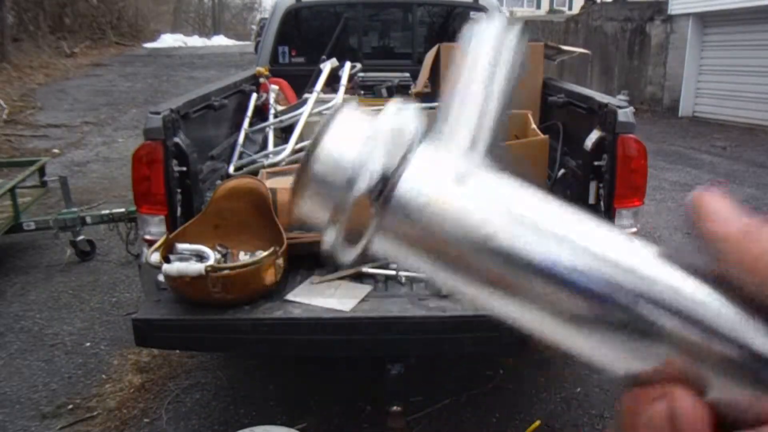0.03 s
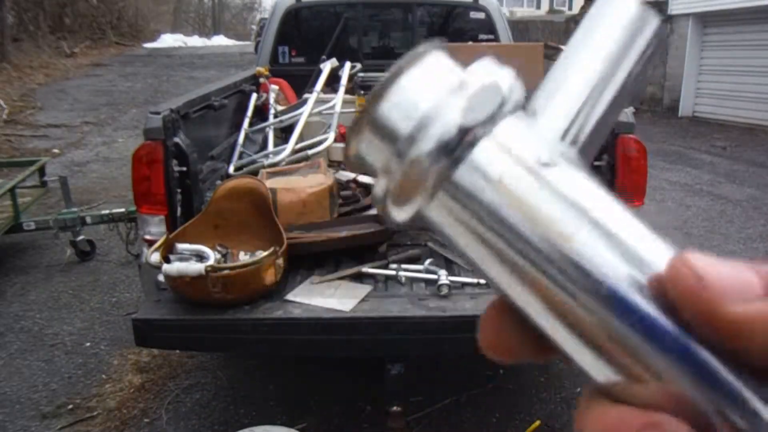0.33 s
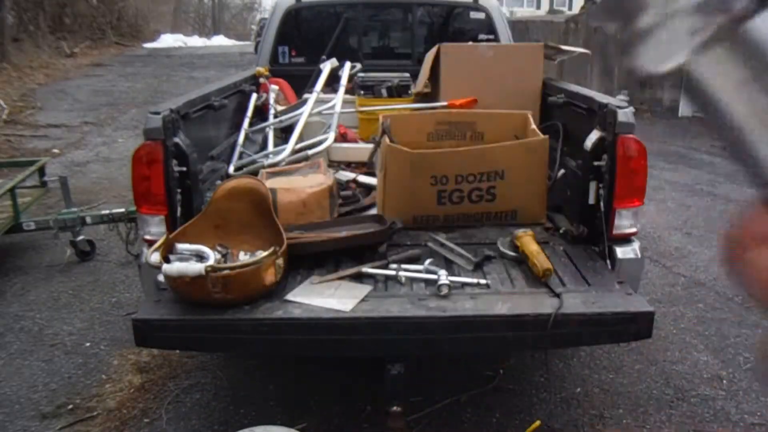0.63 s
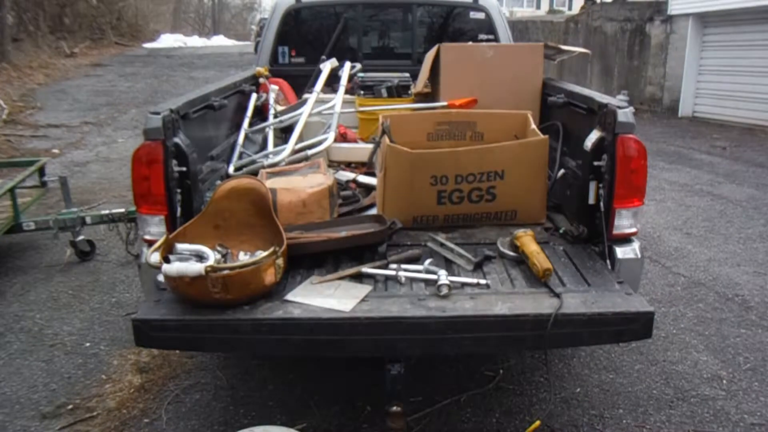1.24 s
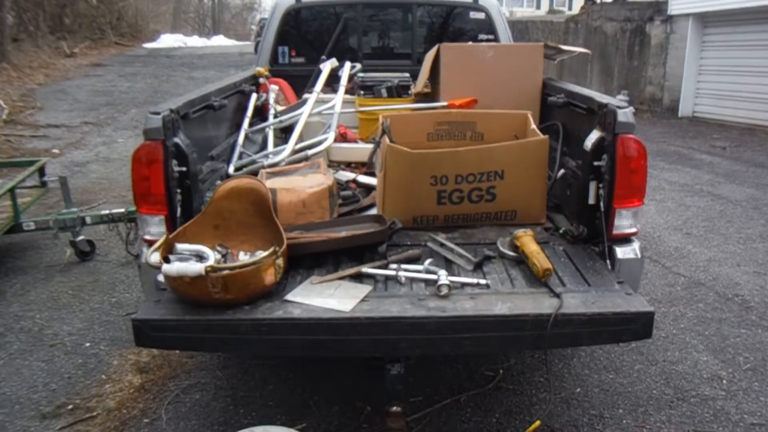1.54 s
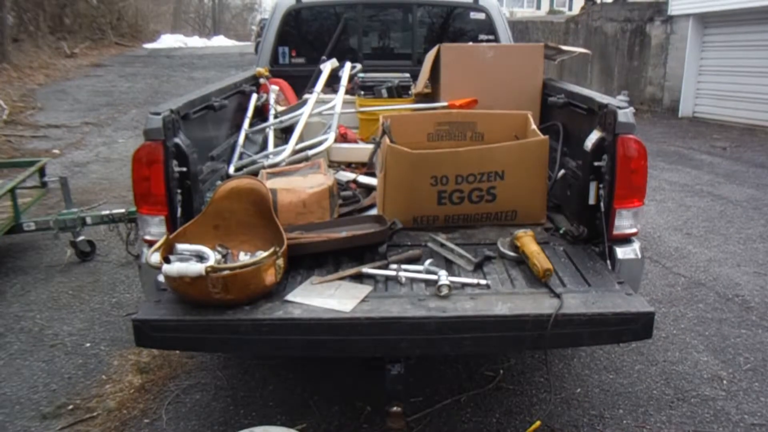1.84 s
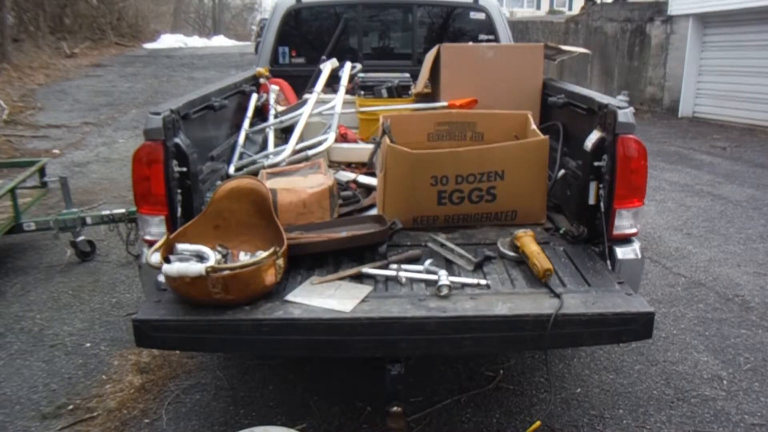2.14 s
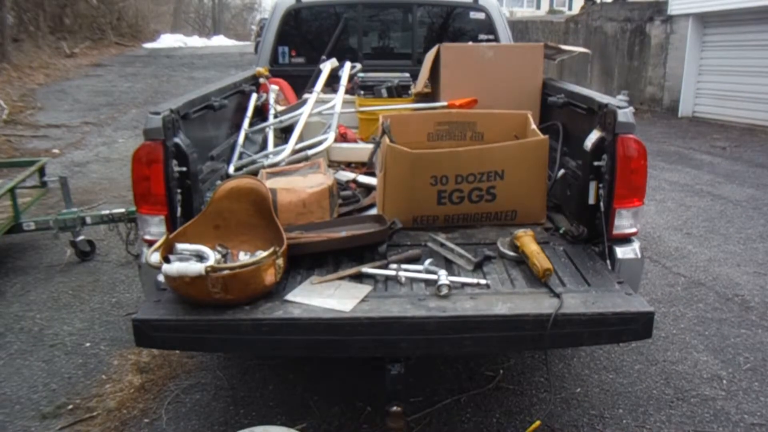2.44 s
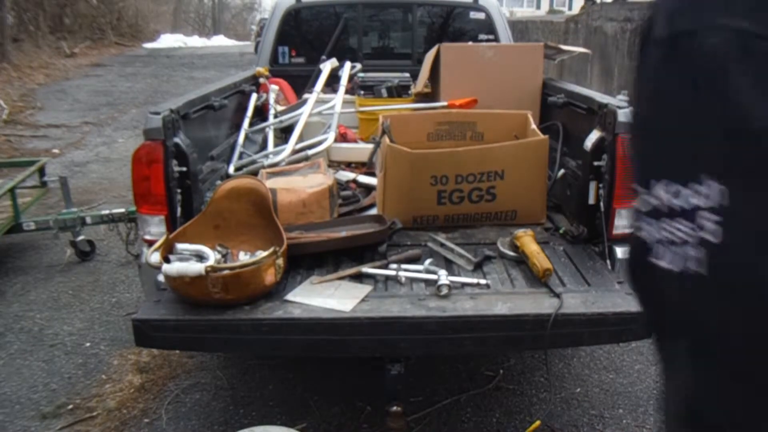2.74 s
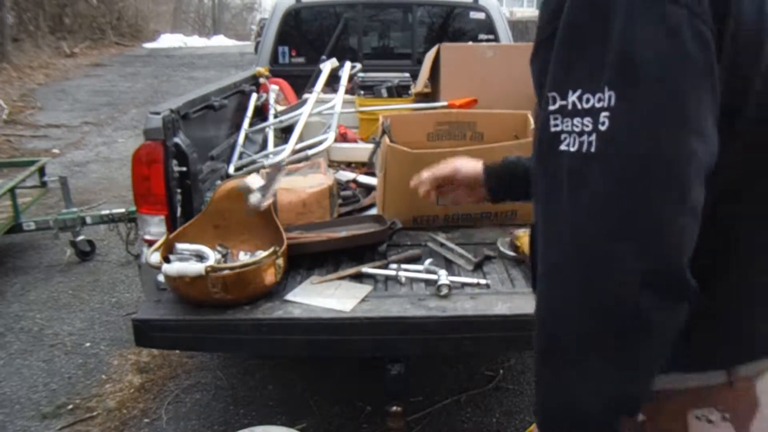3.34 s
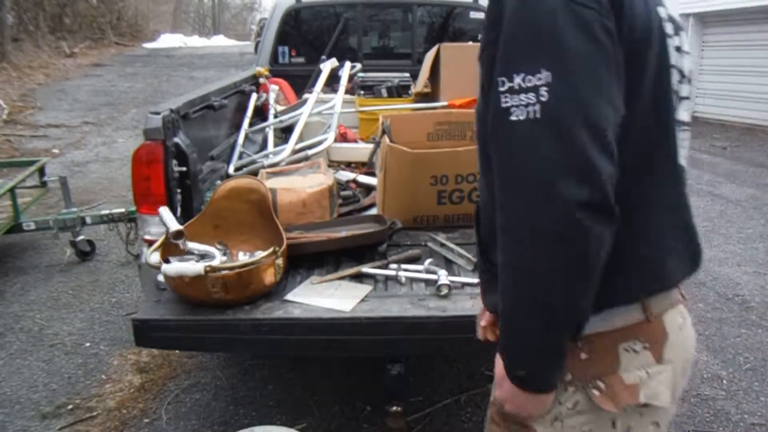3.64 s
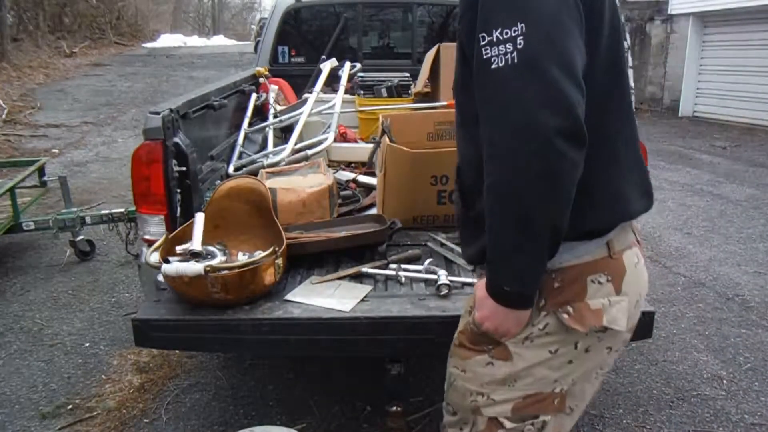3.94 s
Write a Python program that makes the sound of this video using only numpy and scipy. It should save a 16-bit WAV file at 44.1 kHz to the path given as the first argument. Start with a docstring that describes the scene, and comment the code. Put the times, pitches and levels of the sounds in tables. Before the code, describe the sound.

A metal pipe lands in a bowl of scrap, clattering loudly after a quiet outdoor stretch.

```python
"""Still outdoor air with a thin whine, then two soft sleeve rustles and a few faint ticks and scuffs.
At 3.5 s a metal drain pipe, tossed into a bowl of scrap on a truck's tailgate, lands hard, chatters,
hops and falls back. Each contact excites damped modes (tailgate thud, bowl ring, pipe ping) and
noise bursts (loose scrap clashing). Truck bed and nearby walls add short reflections."""
import sys
import numpy as np
from scipy import signal
from scipy.fft import rfft, irfft
from scipy.io import wavfile
from scipy.ndimage import map_coordinates

SR = 44100
rng = np.random.default_rng(int(sys.argv[2]) if len(sys.argv) > 2 else 0)


def bounce(signal):
    """Save signal as a 16-bit WAV file at the path given by the first command-line argument."""
    frames = np.transpose(np.atleast_2d(signal))
    limited = np.clip(frames, -1, 1)
    pcm = np.round(limited * 32767).astype(np.int16)
    wavfile.write(sys.argv[1], SR, pcm)


N = 176400
EVENT_N = int(.6 * SR)
EVENT_T = np.arange(EVENT_N) / SR
WANDER_STEP_S = 1 / 9.03


def amp(db):
    """Decibels to gain."""
    return 10 ** (np.asarray(db) / 20)


def add(mix, start_s, sound):
    """Mix a sound in at start_s."""
    part = mix[max(round(start_s * SR), 0):][:len(sound)]
    part += sound[:len(part)]


def cut(x, hz, kind, order=2):
    """Butterworth filter."""
    return signal.sosfilt(signal.butter(order, hz, kind, fs=SR, output="sos"), x)


def fade(t60_s):
    """Exponential decay, -60 dB at t60_s."""
    return np.exp(-np.log(1000) * EVENT_T / t60_s)


def rise(tau_s):
    """Soft onset of a blow."""
    return 1 - np.exp(-EVENT_T / tau_s)


def noise(spectrum, size=EVENT_N, ripple_db=0):
    """Unit-rms noise with the given spectral shape."""
    bins_hz = np.fft.rfftfreq(size, 1 / SR)
    hz, db = np.transpose(spectrum)
    shape = amp(np.interp(np.log(bins_hz + 1), np.log(hz), db) + ripple_db)
    x = irfft(rfft(rng.standard_normal(size)) * shape, size)
    return x / np.sqrt(np.mean(x ** 2) + 1e-20)


def wander(axis, step):
    """Smooth random curve, one knot per step."""
    return map_coordinates(rng.standard_normal(4096), [axis / step], order=3, mode="wrap")


def ring(modes, opposed=True, spot_db=4):
    """One blow on damped modes; levels vary with the spot struck. Opposed neighbours make it bloom."""
    hz, db, t60_s = np.transpose(modes)
    weights = amp(db + spot_db * rng.standard_normal(len(hz))) / np.linalg.norm(amp(db))
    if opposed:
        weights *= (-1) ** np.arange(len(hz))
    waves = sum(w * fade(d) * np.sin(2 * np.pi * f * EVENT_T) for w, f, d in zip(weights, hz, t60_s))
    return np.sqrt(2) * rise(tau_s=0.00061) * waves


def air(level_db=-56.5, rumble_hz=198, swell_db=3):
    """Outdoor hush with an uneven rumble."""
    # (frequency [Hz], density [dB])
    spectrum = [(12, -33), (20, -4), (98, 0), (160, -8), (250, -9), (494, -13.5), (672, -12.5), (790, -10),
                (1050, -15.5), (1290, -13), (1590, -18), (1900, -16), (2710, -20.5), (5750, -22.5),
                (7000, -22.5), (8500, -22), (15700, -25)]
    hush = amp(level_db) * noise(spectrum, N)
    rumble = signal.sosfiltfilt(signal.butter(2, rumble_hz, fs=SR, output="sos"), hush)
    swell = amp(swell_db * wander(np.arange(N) / SR, WANDER_STEP_S))
    return hush + rumble * (swell - 1)


def whine(waver_hz=0.69):
    """Low hum and thin electrical whine, wavering slightly in pitch."""
    # (frequency [Hz], rms level [dB])
    tones = [(107.7, -74.5), (812.9, -75.5), (7777, -100), (7837, -73), (7897, -75), (7957, -95)]
    drift_hz = waver_hz * wander(np.arange(N) / SR, WANDER_STEP_S)
    out = np.zeros(N)
    for hz, db in tones:
        cycles = np.cumsum(hz + drift_hz) / SR + rng.random()
        out += np.sqrt(2) * amp(db) * np.sin(2 * np.pi * cycles)
    return out


def rustles():
    """A sleeve brushes softly, swelling and fading."""
    # (time [s], length [s], level [dB])
    strokes = [(.235, .09, -56.5), (.42, 0.27, -60)]
    # (frequency [Hz], density [dB])
    cloth_spectrum = [(800, -20), (1500, -9), (2050, 3.5), (3200, -5), (4000, -4), (4550, 3), (5200, 0),
                      (5900, 2.5), (7000, -3), (10500, 0), (15000, -7)]
    out = np.zeros(N)
    for start_s, length_s, db in strokes:
        swell = np.sin(np.pi * np.minimum(EVENT_T / length_s, 1))
        add(out, start_s, amp(db) * swell * noise(cloth_spectrum))
    return out


def ticks():
    """Faint knocks and scuffs: decaying bursts of dull and bright noise."""
    # (time [s], dull level [dB], bright level [dB], t60 [s], low-pass [Hz])
    knocks = [(1.632, -49.5, -54, 0.034, 3000), (1.73, -71, -52, 0.024, 7000),
              (1.8276, -36, -40.5, 0.018, 5030), (1.834, -49.5, -47, 0.031, 6000),
              (1.862, -54, -50, .03, 7000), (2.249, -64, -45.5, 0.02, 9000), (2.603, -55, -54, 0.065, 3000),
              (2.649, -54.5, -45, .14, 2510), (2.672, -51, -66, 0.077, 2200),
              (2.861, -52.5, -70, .04, 1990), (3.300, -50.5, -53, 0.035, 2940),
              (3.330, -60, -52, 0.034, 3030), (3.462, -64, -59, .05, 7000)]
    # spectra (frequency [Hz], density [dB])
    dull = [(100, -4), (300, 3), (650, -1), (1050, 4), (1500, -21.5), (3000, -19), (8000, -32)]
    bright = [(500, -34), (1500, -13), (1950, -1.5), (2500, -6.5), (3300, -10), (4600, -6.5), (5300, -1),
              (6000, -22), (9000, -10), (15000, -24)]
    out = np.zeros(N)
    for start_s, dull_db, bright_db, t60_s, top_hz in knocks:
        burst = amp(dull_db) * noise(dull) + amp(bright_db) * noise(bright)
        add(out, start_s, cut(fade(t60_s) * burst, top_hz, "lowpass"))
    return out


def scrap(clash_db, sizzle_db, ripple_db):
    """Crowded resonances of loose scrap: a clash and a shorter treble sizzle, each with a quiet tail."""
    # (frequency [Hz], density [dB])
    clash_spectrum = [(90, -4.5), (160, -2.5), (210, -25), (330, 4), (600, -4), (800, -2), (950, -8),
                      (1200, 1.5), (1400, -5.5), (1600, 0.5), (1900, -0.5), (2300, -1), (2800, 6.5),
                      (3400, -4), (4200, -4.5), (5000, -11.5), (6500, -24), (16000, -60)]
    sizzle_spectrum = [(2500, -42), (4400, -14), (5000, -9), (5330, 7.5), (5600, -7), (6000, 3),
                       (6450, -13), (6900, -11), (7300, -2.5), (7850, 5), (8250, 0), (8600, 0.5), (9500, 3),
                       (10300, 2.5), (11300, 4), (11900, -8), (12700, 5.5), (13800, -9), (15600, -3.5)]
    tail_gain = amp(-11)
    tail = tail_gain * fade(t60_s=0.38)
    clash = amp(clash_db) * noise(clash_spectrum, ripple_db=ripple_db) * (fade(t60_s=0.14) + tail)
    sizzle = amp(sizzle_db) * noise(sizzle_spectrum, ripple_db=ripple_db) * (fade(t60_s=0.047) + tail)
    return rise(tau_s=0.00065) * (clash + sizzle) / (1 + tail_gain)


def clatter():
    """Each pipe contact shakes the scrap, thumps the tailgate and rings bowl and pipe."""
    # (time [s], tailgate [dB], clash [dB], sizzle [dB], bowl [dB], pipe [dB])
    contacts = [(3.5330, -25, -24.5, -20, -24.5, -33), (3.5361, -18, -15.5, -24.5, -28, -26),
                (3.5400, -26, -23.5, -36, -28, -45), (3.5520, -52, -26.5, -23, -17.5, -38),
                (3.5548, -59, -34.5, -40, -21, -33.5), (3.5725, -50, -28.5, -48, -22.5, -57),
                (3.5976, -58, -35, -38, -30, -50), (3.6150, -50, -34, -51, -26.5, -58),
                (3.6402, -49, -29.5, -37, -60, -52), (3.6480, -31.5, -29, -38, -64, -52),
                (3.6640, -35.5, -30.5, -34.5, -28, -58), (3.6980, -41, -36, -43, -39.5, -47),
                (3.7270, -36.5, -41, -53, -40.5, -58), (3.7500, -55, -53, -49, -63, -62),
                (3.8069, -38, -35, -38.5, -48.5, -53), (3.8136, -30.5, -31.5, -47, -41, -59),
                (3.8400, -50, -35, -42, -44, -58), (3.8539, -36.5, -29.5, -34.5, -37, -50),
                (3.8650, -38, -37, -49, -32.5, -39), (3.885, -40, -32, -41, -39.5, -60),
                (3.9050, -49, -46, -41, -34, -40.5), (3.917, -55, -55, -46, -41, -46),
                (3.934, -43.5, -38.5, -45, -43, -58), (3.9620, -30, -34.5, -49, -51, -62),
                (3.983, -52, -33.5, -44, -36, -58)]
    # (frequency [Hz], relative level [dB], t60 [s])
    tailgate_modes = [(149.6, -12.5, 0.12), (273, -9, 0.067), (324, -2, 0.061), (363.7, -1.5, 0.096),
                      (479, -5.5, 0.059), (687, -8.5, 0.095)]
    bowl_modes = [(2458, -3, .15), (2501, -11, .15), (2559, -10, .24), (2611, -3, .26), (2670, -3, .26),
                  (2719, -12, .17), (2776, -4, .13), (2836, 0, .19), (2872, -7, .14), (3019, -7, .24),
                  (3043, -12, .2), (3080, -12, .18), (3141, -10, .14), (3345, -13, .14), (3626, -6.5, .18),
                  (3748, -15, .23)]
    pipe_modes = [(4070, -9, .18), (4352, -8, .18), (5320, -8, .08), (5895, -7, .1), (5985, -4, .09),
                  (7908, -16, .15), (8511, -11, .15), (10100, -7, .13), (10366, 0, .07), (10480, -7, .09),
                  (10648, -11, .11), (12656, -16, .14), (13211, -17, .15)]
    clink_modes = [(5310, 3, 0.048), (5338, -5, 0.042)]
    bins_hz = np.fft.rfftfreq(EVENT_N, 1 / SR)
    ripple_db = 3.0 * wander(bins_hz, step=29.75)  # same scrap resonances at every contact
    out = np.zeros(N)
    for start_s, tailgate_db, clash_db, sizzle_db, bowl_db, pipe_db in contacts:
        blow = scrap(clash_db, sizzle_db, ripple_db)
        blow += amp(tailgate_db) * ring(tailgate_modes, opposed=False)
        blow += amp(bowl_db) * ring(bowl_modes)
        blow += amp(pipe_db) * ring(pipe_modes)
        add(out, start_s, blow)
    clink = amp(-24.5) * ring(clink_modes, opposed=False)  # small part knocked on landing
    add(out, 3.5345, clink)
    return cut(out, hz=98, kind="highpass", order=3)


def yard(x, level_db=-13.5, delay_s=.012, tap_density=.04):
    """Sparse, short reflections from the truck bed and nearby walls."""
    taps = rng.standard_normal(EVENT_N) * (rng.random(EVENT_N) < tap_density)
    taps *= fade(t60_s=0.39) * (EVENT_T > delay_s)
    return amp(level_db) * signal.fftconvolve(x, taps / np.linalg.norm(taps))[:N]


def scene():
    """Near sources and their reflections over air and whine, mono."""
    near = clatter() + ticks() + rustles()
    return (near + yard(near) + air() + whine())[None]


def record(dry):
    """Round off the highest peaks, then limit the band."""
    ceiling = amp(5.5)
    rounded = ceiling * np.tanh(dry / ceiling)
    lowpass = signal.firwin(601, cutoff=15850, window=("kaiser", 9), fs=SR)
    return signal.oaconvolve(rounded, lowpass[None], "same")


dry = scene()
out = record(dry)
bounce(out)
```